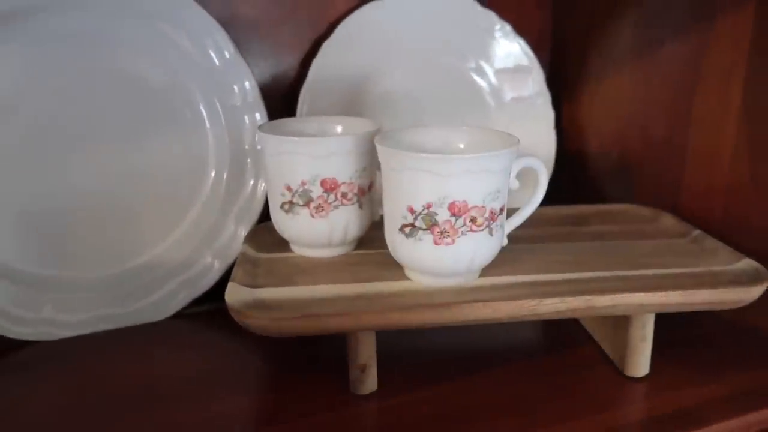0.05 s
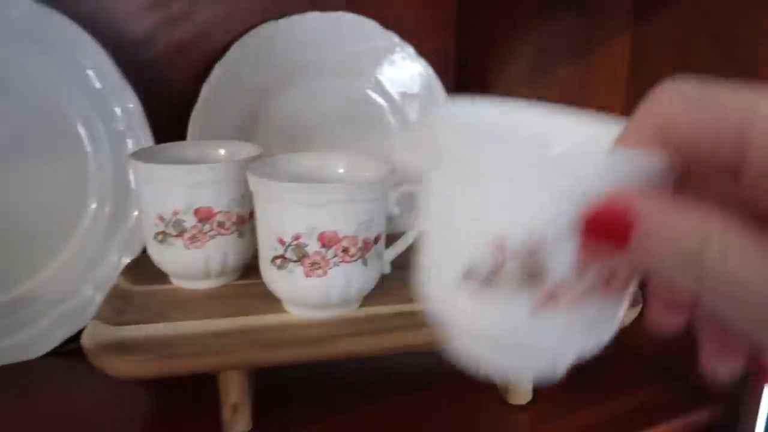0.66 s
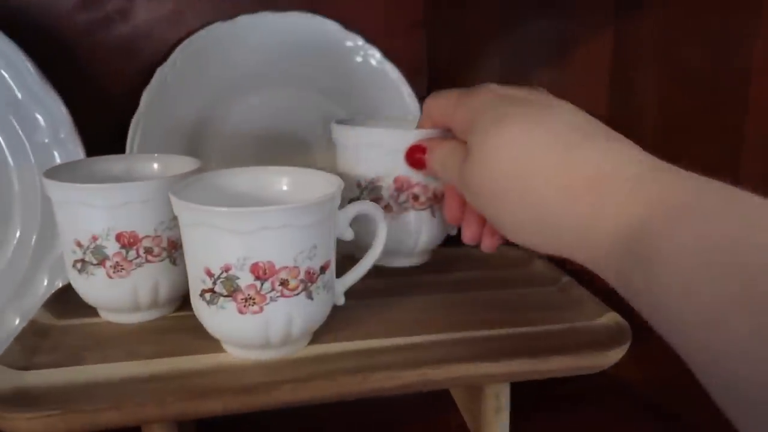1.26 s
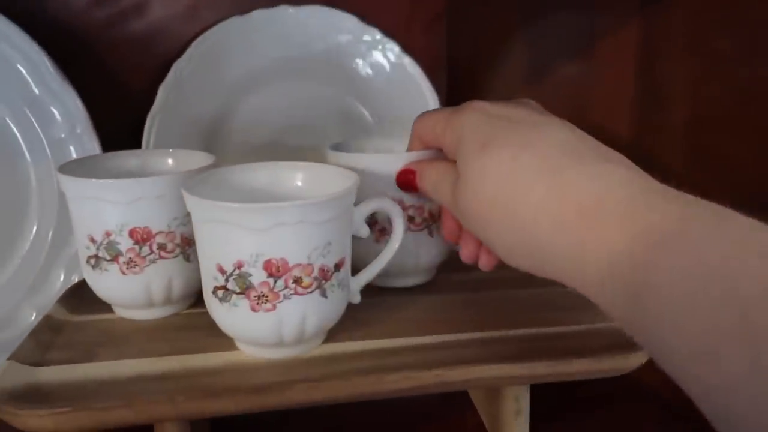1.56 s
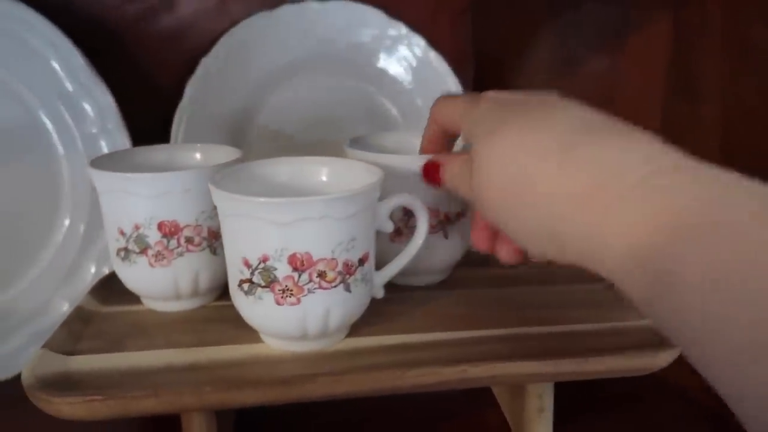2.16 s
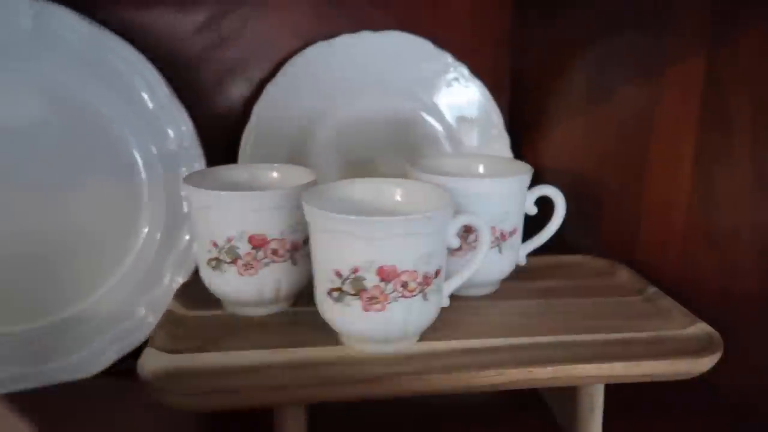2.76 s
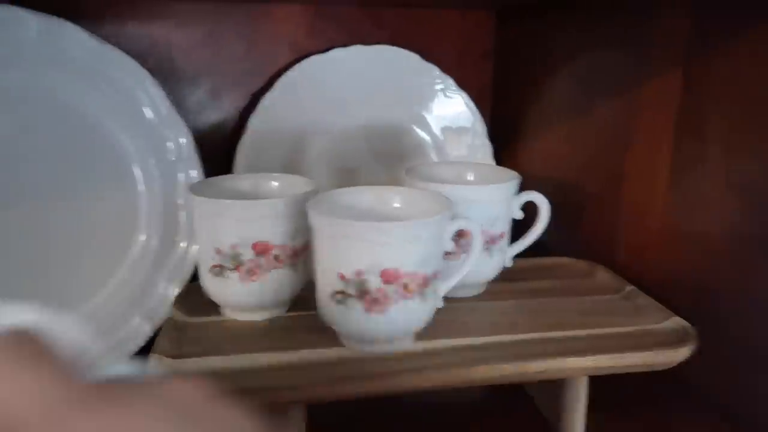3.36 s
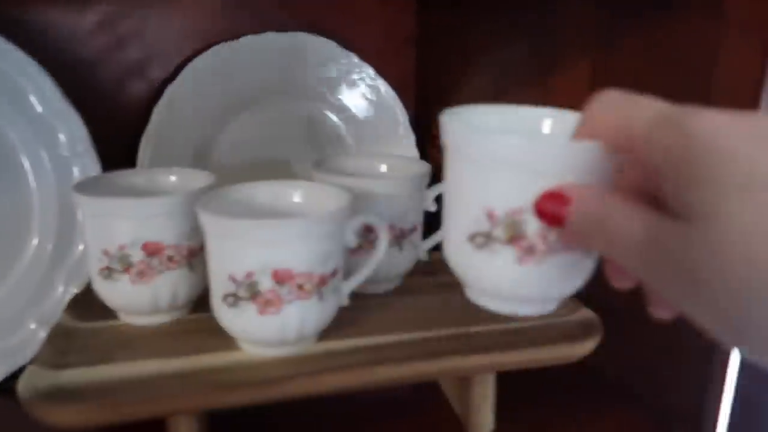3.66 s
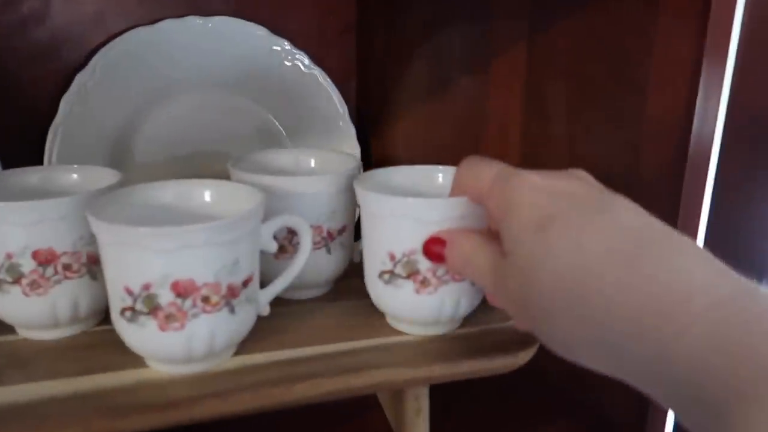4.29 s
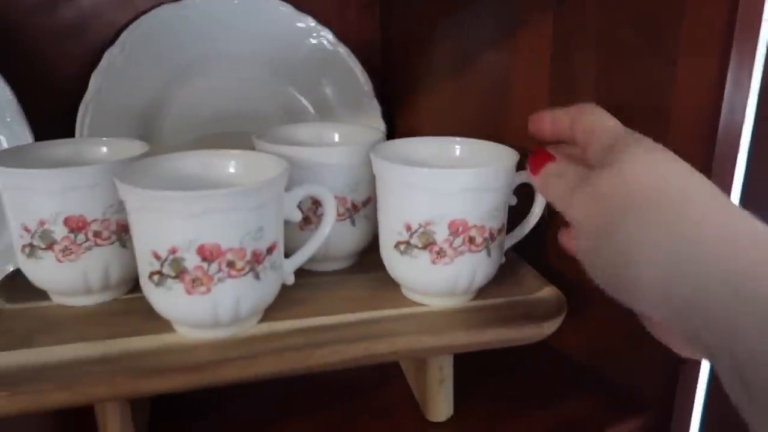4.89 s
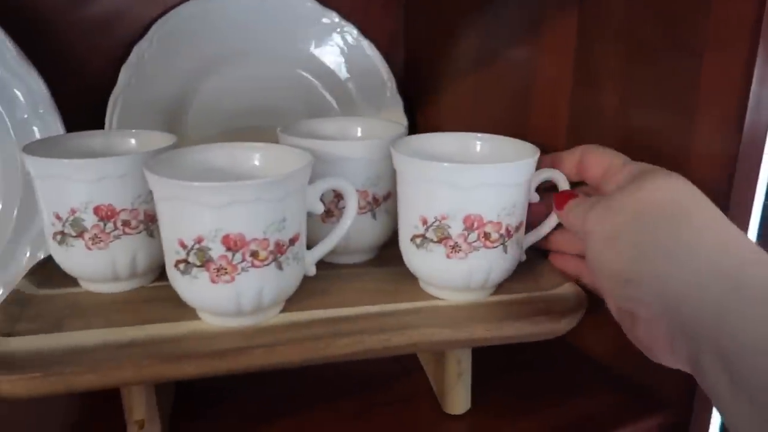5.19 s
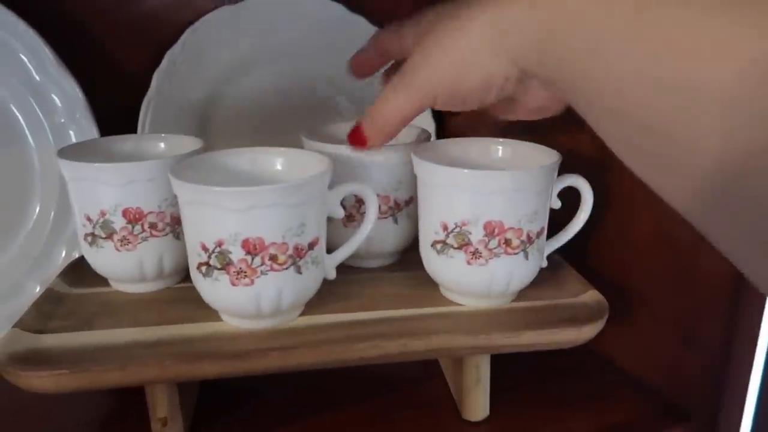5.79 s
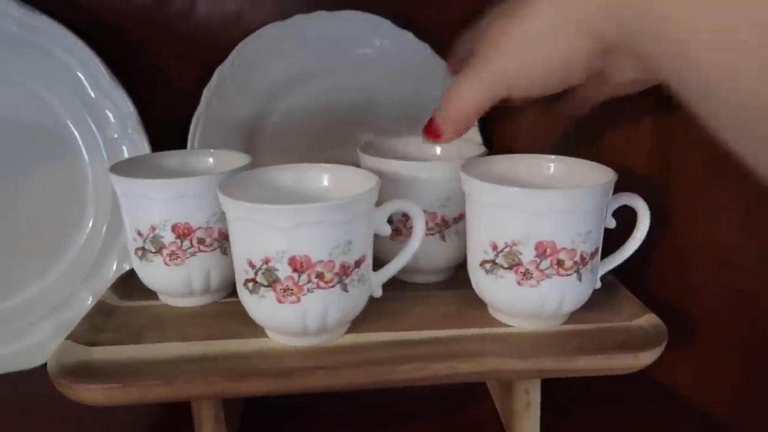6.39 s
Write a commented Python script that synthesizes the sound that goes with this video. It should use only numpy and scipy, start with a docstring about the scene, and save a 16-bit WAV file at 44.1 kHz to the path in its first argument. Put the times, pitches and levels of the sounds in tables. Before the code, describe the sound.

Small china cups are set down on wood with short clinks and dull knocks, over a low refrigerator hum.

```python
"""Small china cups are set down on a wooden riser inside a kitchen cabinet, close by.
Each contact rings the gripped cup, riser, shelf, back panel and cabinet, then echoes in the kitchen.
Dull bumps, a thud and a hollow knock sound on the woodwork, with faint scuffs and clothing rustle.
A faint whine sinks in pitch at the start; a refrigerator hums over low room noise."""
import sys
import numpy as np
from scipy import signal
from scipy.fft import rfft, irfft, next_fast_len
from scipy.io import wavfile
from scipy.ndimage import map_coordinates

SR = 44100
rng = np.random.default_rng(int(sys.argv[2]) if len(sys.argv) > 2 else 0)


def generate_wav(signal):
    """Clip the signal to [-1, 1] and save it as 16-bit WAV at the path in sys.argv[1]."""
    frames = np.transpose(np.atleast_2d(signal))
    scaled = np.clip(frames, -1, 1) * 32767
    pcm = np.round(scaled).astype(np.int16)
    wavfile.write(sys.argv[1], SR, pcm)


N = 292821

# cup landings: start_s, cup, level_db, weight_db, china_db, hardness_db_per_oct, tip_delay_s,
# second_contact_db, grit_db
LANDINGS = [(1.6195, "back", -6, -1, -2.5, 0.5, 0.0043, -16.5, 4.5),
            (4.3198, "front", -5, -5, -1.5, -0.5, 0.0076, -10, 3),
            (4.507, "front", -21, 2.5, -4, -0.5, 0.0085, -6.5, -5),
            (4.946, "front", -44.5, 5, 8, 11, 0.0069, -3, 0)]
# knocks on the woodwork: start_s, level_db, boom_db, china_db
WOOD_BUMPS = [(.004, -27, 8, -13), (.123, -37, 17, -14), (0.8524, -27.5, -1, -15), (3.066, -28.5, 4, -11)]
# fingers leaving a cup: start_s, level_db, pitch_ratio
CUP_RELEASES = [(2.195, 1, 1), (4.612, 4, .885)]

# modes of each part (cup and riser keyed by cup): pitch_hz, level_db, t60_s
CUP_MODES = {"back": [(1440, -7, 0.037), (1610, -5, 0.021), (1742, -9, .05), (2000, -25, 0.063),
             (2115, -20, 0.065), (2210, -22.5, 0.059), (2610, -23, .03), (2910, -29, 0.048),
             (3062, -20, 0.033), (3300, -25, 0.015), (3660, -30, 0.025), (4330, -33, 0.026)],
             "front": [(1573, -7, 0.039), (1700, -21, 0.033), (1863, -18.5, 0.047), (2020, -19.5, 0.043),
             (2194, -23.5, 0.065), (2365, -31.5, 0.07), (2680, -23.5, 0.033), (2910, -28.5, 0.04),
             (3050, -27, .022), (3750, -28.5, 0.028), (4420, -31.5, 0.022), (7020, -47, .035)]}
FREE_CUP_MODES = [(2330, -60, .45), (6050, -59, .16), (11000, -66, .1)]
RISER_MODES = {"back": [(1040, -25, .04), (1160, -10, .028), (1230, -1, 0.025), (1275, -3, 0.037)],
               "front": [(1067, -14, 0.034), (1150, -4.5, .023), (1243, -0.5, 0.029), (1306, -14, 0.029)]}
SHELF_MODES = [(582, -18.5, 0.09), (679, -31, 0.29), (732, -6, 0.03), (752, -40, 0.24), (848, -13.5, 0.059)]
PANEL_MODES = [(407, -20.5, 0.1), (448.6, -17, 0.085), (481, -11, 0.085), (515, -22, 0.036)]
CABINET_MODES = [(95, -23.5, 0.26), (150, -16, 0.14), (191, -23, 0.18), (230.5, -24.5, 0.13),
                 (291, -15.5, 0.125)]
THUD_MODES = [(194, -9, .08), (294, -8, 0.15), (410, -12, 0.058), (468, -1, .05), (710, -6, .04),
              (878, -5, 0.041), (1400, -19, 0.048)]
HOLLOW_MODES = [(224, -16, 0.04), (484, -21.5, 0.29), (559, -38.5, 0.32), (614, -32, .2), (684, -6, 0.038),
                (712, -26, 0.2), (820, -22.5, 0.1), (1360, -32.5, 0.045), (2190, -47, 0.033)]

# scuffs around the bumps: peak_s, level_db
SCUFF_PEAKS = [(.03, -35.5), (.14, -47.5), (3.04, -42), (3.095, -37), (3.17, -34.5)]
# arm movements: peak_s, cloth_db, rim_offset_db
RUSTLE_PEAKS = [(.72, -62.5, -8), (1.07, -56.5, -4), (3.3, -57, -4.5), (5.25, -63, -15), (5.53, -50, -16.5)]
# sinking tone and its lead-in: time_s, pitch_hz, level_db, flutter_depth_hz
WHINE_PATH = [(.27, 414, -50, 6.1), (.37, 410, -49.5, 5.1), (.45, 386, -50, 7.8), (.51, 385, -59, 21),
              (.565, 370, -44.5, 30), (.65, 355, -57, 17.5), (.78, 349, -48.5, 3.95), (.95, 344, -48.5, 2),
              (1.07, 330, -50.5, 1.94), (1.22, 323, -43.5, 0.6), (1.58, 316, -47, 0.6)]
LEAD_PATH = [(.25, 495, -50, 5.3), (.31, 487, -50, 5), (.42, 480, -60, 8)]
# refrigerator motor and mains lines: pitch_hz, rms_db
HUM_LINES = [(120.0, -42.5), (141.8, -51), (164.0, -61.5), (240.0, -65.5), (360.0, -59), (925.9, -73),
             (1125, -67.5), (1303, -75.5), (2293, -83)]

# noise spectra: freq_hz, relative_density_db
GRIT_SPECTRUM = [(400, -38), (1400, 6), (3100, 5), (3700, -4), (4500, -0.5), (7000, -14.5), (10000, -25),
                 (15000, -33)]  # unglazed foot of the cup
GRAIN_SPECTRUM = [(300, -23), (600, -9), (850, 2), (1200, -1), (1700, 3.5), (2200, -2), (2600, -21),
                  (5000, -53)]  # the riser's small, crowded resonances
SHIVER_SPECTRUM = [(400, -25), (700, -5), (950, -8), (1300, 0), (1800, 0), (2150, -6), (2500, -22),
                   (5000, -42), (10000, -70)]  # surrounding crockery
SLAP_SPECTRUM = [(200, -5), (900, -3), (1600, -10), (2000, -25), (2450, -17), (3200, -34), (8000, -70)]  # dull contact on wood
SHUDDER_SPECTRUM = [(40, -28), (85, 5.5), (150, -8), (260, -18), (600, -59)]
SCUFF_SPECTRUM = [(60, -37), (150, -3), (200, 3), (300, 1), (380, -7), (470, 3.5), (580, -16), (750, -8),
                  (1000, -19), (1400, -21.5), (2000, -32), (4000, -35), (9000, -80)]
CLOTH_SPECTRUM = [(200, -3), (450, 14), (700, 7), (1400, 1), (2000, -4.5), (3000, -10), (5000, -15.5),
                  (10000, -31), (14000, -46)]
RIM_SPECTRUM = [(1700, -26), (2200, -8), (2450, -2.5), (2650, -7), (3100, -24), (6000, -50)]  # fingers on china
RUMBLE_SPECTRUM = [(20, -20), (35, -17), (55, -4.5), (85, -4), (150, -2), (205, -12.5), (280, -6),
                   (350, -3), (430, -8.5), (560, -15.5), (700, -26), (1200, -51)]
HISS_SPECTRUM = [(300, -26), (600, -0.5), (820, 1), (1120, 2), (1500, -5), (2000, -8), (2500, -9.5),
                 (4000, -10), (6300, -17.5), (10000, -24), (12500, -30.5), (14800, -52)]

# echoes off nearby surfaces: delay_s, gain_db
REFLECTIONS = [(.0092, -16), (0.016, -19), (0.024, -18), (0.032, -23.5), (0.0417, -22), (0.056, -24)]
# reverberation in cabinet and kitchen: freq_hz, t60_s
CABINET_DECAY = [(150, 0.26), (600, 0.065), (1300, 0.062), (3000, 0.029), (9000, 0.032)]
KITCHEN_DECAY = [(120, 1), (400, 0.57), (800, 0.33), (1300, 0.52), (2000, 0.46), (3000, 0.2), (9000, 0.38)]
# what escapes into the kitchen: freq_hz, gain_db
KITCHEN_EQ = [(150, 1.5), (450, -1), (750, 3.5), (1230, -6), (1600, -3.5), (2100, -2), (4000, -4)]
# left-right likeness of room noise and echoes: freq_hz, correlation
ROOM_COHERENCE = [(100, 1), (180, 0.82), (300, 0.63), (520, 0.38), (900, -0.1), (1500, 0.16), (2600, 0.059),
                  (4200, -0.25), (7000, -0.005)]
ECHO_COHERENCE = [(200, 1), (700, 0.71), (1300, 0.87), (2200, 0.58), (4000, -0.79), (8000, 0.092)]
# microphone port imbalance: freq_hz, left_minus_right_db
PORT_BALANCE = [(480, 0), (620, -5), (760, -1.5), (900, -1.5), (1130, 0.7), (2000, 0), (6000, 0)]

SCENE_S = np.arange(N) / SR
HIT_S = np.arange(SR // 2) / SR


def set_downs(cabinet_db=1.5, panel_db=2, shelf_db=4.5):
    """A cup lands on one edge of its foot, then tips flat; its weight drives the furniture."""
    hits = []
    for start_s, cup, db, weight_db, china_db, hardness, tip_delay_s, second_db, grit_db in LANDINGS:
        wood_db = db + weight_db
        parts_db = np.array([wood_db + cabinet_db, wood_db + panel_db, wood_db + shelf_db,
                             db, db + china_db])
        hits.append((start_s, contact(cup, *parts_db, hardness, grit_db)))
        hits.append((start_s + tip_delay_s, contact(cup, *(parts_db + second_db), hardness, grit_db)))
    return in_kitchen(hits)


def contact(cup, cabinet_db, panel_db, shelf_db, riser_db, cup_db, hardness_db_per_oct=0, grit_db=0):
    """One contact rings cup and furniture and shakes nearby crockery; the wood starts more slowly."""
    parts = np.array([
        ring(CABINET_MODES, attack_s=0.0031, opposed=True),
        ring(PANEL_MODES, attack_s=0.0018),
        ring(SHELF_MODES, attack_s=0.0036, opposed=True),
        ring(RISER_MODES[cup], attack_s=0.0013),
        ring(CUP_MODES[cup], attack_s=0.00099, tilt_db_per_oct=hardness_db_per_oct, opposed=True)])
    grit = burst(GRIT_SPECTRUM, ROOM_COHERENCE, cup_db + grit_db - 31, t60_s=0.026)
    grain = burst(GRAIN_SPECTRUM, ECHO_COHERENCE, riser_db - 20, t60_s=0.085) * rise(attack_s=0.0033)
    shiver = burst(SHIVER_SPECTRUM, ECHO_COHERENCE, cup_db - 30, t60_s=0.42) * rise(attack_s=0.012)
    return amp([cabinet_db, panel_db, shelf_db, riser_db, cup_db]) @ parts + grit + grain + shiver


def bumps(rebound_s=0.00431, rebound_db=-8, panel_boom_share=0.39):
    """Soft knocks on the woodwork boom in cabinet and back panel; each rebounds once."""
    hits = []
    for start_s, db, boom_db, china_db in WOOD_BUMPS:
        panel_db = db - 1 + panel_boom_share * boom_db
        riser_db = db + china_db
        parts_db = np.array([db + boom_db, panel_db, db, riser_db, riser_db - 6])
        hits.append((start_s, contact("back", *parts_db)))
        hits.append((start_s + rebound_s, contact("back", *(parts_db + rebound_db))))
    return in_kitchen(hits)


def thud(start_s=3.1225, ring_db=-17):
    """One firm, dull thud on a wooden board, with no china in it."""
    board = amp(ring_db) * ring(THUD_MODES, attack_s=0.0016)
    return in_kitchen([(start_s, board + slap(level_db=-31))])


def hollow_knock(start_s=4.8035, ring_db=-0.5, right_bias_db=1.5):
    """A knock on hollow wood, slightly right: a short clonk, then a lingering low ring."""
    clonk = amp(ring_db) * ring(HOLLOW_MODES, attack_s=0.0023)
    pan = amp([-right_bias_db / 2, right_bias_db / 2])
    return in_kitchen([(start_s, np.outer(pan, clonk) + slap(level_db=-33))])


def slap(level_db):
    """Contact noise of a dull blow on wood."""
    return burst(SLAP_SPECTRUM, ECHO_COHERENCE, level_db, t60_s=0.044) * rise(attack_s=0.0012)


def releases():
    """A fingertip brushes the rim as it lets go; the undamped cup sings faintly."""
    track = np.zeros((2, N))
    for start_s, level_db, pitch_ratio in CUP_RELEASES:
        modes = [(hz * pitch_ratio, db + level_db, t60_s) for hz, db, t60_s in FREE_CUP_MODES]
        add(track, np.tile(ring(modes, attack_s=0.005), (2, 1)), start_s)
    return track


def shudder(peak_s=4.68, level_db=-41.5):
    """The furniture rumbles briefly as the front cup is nudged."""
    envelope = swells([(peak_s, level_db)], rise_db_per_s=49, fall_db_per_s=106)
    return envelope * noise(SHUDDER_SPECTRUM, ECHO_COHERENCE)


def scuffs():
    """Dull stick-slip rubbing around the bumps."""
    envelope = swells(SCUFF_PEAKS, rise_db_per_s=207, fall_db_per_s=174)
    stick_slip = amp(1.5 * wobble(rate_hz=60))
    return envelope * stick_slip * noise(SCUFF_SPECTRUM, ECHO_COHERENCE)


def rustles():
    """Clothing rustles as the arm moves; fingers on a carried cup add a thin hiss."""
    cloth_peaks = [(peak_s, db) for peak_s, db, _ in RUSTLE_PEAKS]
    cloth_gain = swells(cloth_peaks, rise_db_per_s=30, fall_db_per_s=57) * amp(1.6 * wobble(rate_hz=25))
    cloth = cloth_gain * noise(CLOTH_SPECTRUM, ROOM_COHERENCE)
    rim_peaks = [(peak_s, db + offset_db) for peak_s, db, offset_db in RUSTLE_PEAKS]
    rim_gain = swells(rim_peaks, rise_db_per_s=55, fall_db_per_s=70) * amp(2.5 * wobble(rate_hz=45))
    return cloth + rim_gain * noise(RIM_SPECTRUM, ROOM_COHERENCE)


def whine(fade_s=0.027):
    """A faint tone sinks, flutters, then steadies; a short higher tone leads it in."""
    tones = 0
    for path in (WHINE_PATH, LEAD_PATH):
        time_s, *columns = np.transpose(path)
        hz, db, flutter_hz = (np.interp(SCENE_S, time_s, column) for column in columns)
        gate = np.clip(np.minimum(SCENE_S - time_s[0], time_s[-1] - SCENE_S) / fade_s, 0, 1)
        phase = 2 * np.pi * np.cumsum(hz + flutter_hz * wobble(rate_hz=70)) / SR
        tones += gate * amp(db + 0.7 * wobble(rate_hz=12)) * np.sqrt(2) * np.sin(phase)
    return tones


def refrigerator():
    """Motor and mains lines, each drifting slightly in level and phase."""
    hum = 0
    for hz, rms_db in HUM_LINES:
        gain = amp(rms_db + 0.4 * wobble(rate_hz=3.08)) * np.sqrt(2)
        phase = 2 * np.pi * (hz * SCENE_S + rng.random()) + 0.063 * wobble(rate_hz=1)
        hum += gain * np.sin(phase)
    return hum


def room_noise(rumble_db=-46.5, hiss_db=-55):
    """Low rumble under smooth hiss; both drift by about 1 dB."""
    rumble = amp(rumble_db - wobble(rate_hz=6.5)) * noise(RUMBLE_SPECTRUM, ROOM_COHERENCE)
    hiss = amp(hiss_db - wobble(rate_hz=2.02)) * noise(HISS_SPECTRUM, ROOM_COHERENCE)
    return rumble + hiss


def in_kitchen(hits, scatter_db=-1, scatter_highpass_hz=1200, tail_db=-13):
    """Mix (start_s, sound) hits with wall echoes, quick scatter off crockery and the room's tail."""
    track = np.zeros((2, N))
    for start_s, sound in hits:
        add(track, sound, start_s)
        for delay_s, db in REFLECTIONS:
            add(track, amp(db) * sound, start_s + delay_s)
        scatter = reverb(CABINET_DECAY, onset_s=0.003)
        scatter = filtered(scatter, lambda hz: hz / np.hypot(hz, scatter_highpass_hz))
        tail = filtered(reverb(KITCHEN_DECAY, onset_s=0.018), lambda hz: amp(along(KITCHEN_EQ, hz)))
        response = amp(scatter_db) * scatter + amp(tail_db) * tail
        add(track, signal.fftconvolve(sound, response, axes=1), start_s)
    return track


def reverb(decay, onset_s):
    """Diffuse response of unit energy; each frequency decays at its own rate."""
    hz, frame_s, bins = signal.stft(stereo_noise(ECHO_COHERENCE, SR // 2), SR, nperseg=256)
    tail = signal.istft(bins * amp(-60 * frame_s / along(decay, hz)[:, None]), SR, nperseg=256)[1]
    time_s = np.arange(tail.shape[1]) / SR
    tail *= 1 - np.exp(-(time_s / onset_s) ** 2)
    return tail / np.linalg.norm(tail[0])


def ring(modes, attack_s, tilt_db_per_oct=0, opposed=False):
    """Damped modes; opposed neighbours start in antiphase, so the sound builds more slowly."""
    middle_hz = np.median([hz for hz, _, _ in modes])
    swing = 0
    for k, (hz, db, t60_s) in enumerate(modes):
        envelope = amp(db + tilt_db_per_oct * np.log2(hz / middle_hz) - 60 * HIT_S / t60_s)
        swing += (-1) ** (k * opposed) * envelope * np.sin(2 * np.pi * hz * HIT_S)
    return swing * rise(attack_s)


def burst(spectrum, coherence, level_db, t60_s):
    """Decaying stereo noise."""
    return amp(level_db - 60 * HIT_S / t60_s) * noise(spectrum, coherence, len(HIT_S))


def rise(attack_s):
    """Exponential onset from 0 to 1."""
    return 1 - np.exp(-HIT_S / attack_s)


def swells(peaks, rise_db_per_s, fall_db_per_s):
    """Gain that climbs to each (peak_s, level_db) and dies away."""
    return sum(amp(db - np.maximum(rise_db_per_s * (s - SCENE_S), fall_db_per_s * (SCENE_S - s)))
               for s, db in peaks)


def noise(spectrum, coherence, size=N):
    """Coloured stereo noise of rms 1."""
    coloured = filtered(stereo_noise(coherence, size), lambda hz: amp(along(spectrum, hz)))
    return coloured / np.sqrt(np.mean(coloured ** 2) + 1e-20)


def stereo_noise(coherence, size):
    """White noise with the given left-right correlation."""
    def mid_side_gains(hz):
        angle = np.arccos(np.clip(along(coherence, hz), -1, 1)) / 2
        return np.array([np.cos(angle), np.sin(angle)])
    mid, side = filtered(rng.standard_normal((2, size)), mid_side_gains)
    return np.array([mid + side, mid - side])


def wobble(rate_hz):
    """Smooth random curve with knots at rate_hz."""
    knots = rng.standard_normal(int(N * rate_hz / SR) + 4)
    return map_coordinates(knots, [SCENE_S * rate_hz])


def filtered(x, response):
    """Zero-phase filter with gain response(hz)."""
    size = x.shape[-1]
    padded = next_fast_len(size + 8192)
    return irfft(rfft(x, padded) * response(np.fft.rfftfreq(padded, 1 / SR)), padded)[..., :size]


def along(points, hz):
    """Interpolate (freq_hz, value) points on a log axis."""
    freq_hz, values = np.transpose(points)
    return np.interp(np.log(hz + 1), np.log(freq_hz + 1), values)


def add(track, sound, start_s):
    """Mix a sound into the track."""
    start = max(round(start_s * SR), 0)
    track[:, start:start + sound.shape[-1]] += sound[:, :N - start]


def amp(db):
    """Decibels to gain."""
    return 10 ** (np.asarray(db) / 20)


def scene():
    """Cups in front, kitchen all around."""
    impacts = set_downs() + bumps() + thud() + hollow_knock()
    handling = releases() + shudder() + scuffs() + rustles()
    return impacts + handling + whine() + refrigerator() + room_noise()


def record(dry, cutoff_hz=14800):
    """The right microphone port favours the midrange; nothing passes above the cutoff."""
    return filtered(dry, lambda hz: amp(np.outer([0.5, -0.5], along(PORT_BALANCE, hz))) * (hz < cutoff_hz))


dry = scene()
out = record(dry)
generate_wav(out)
```